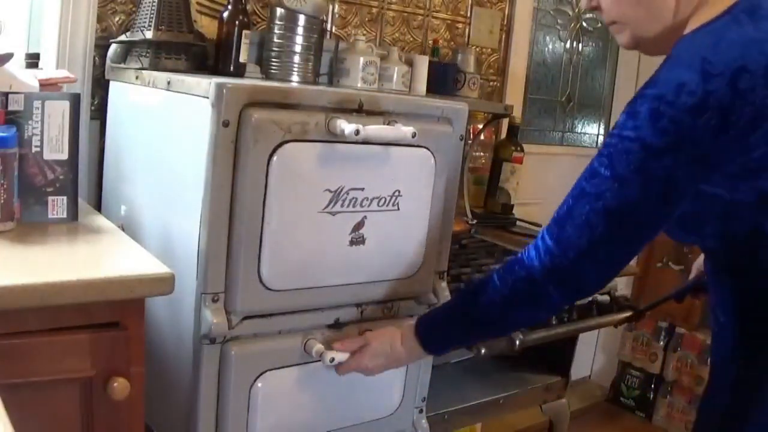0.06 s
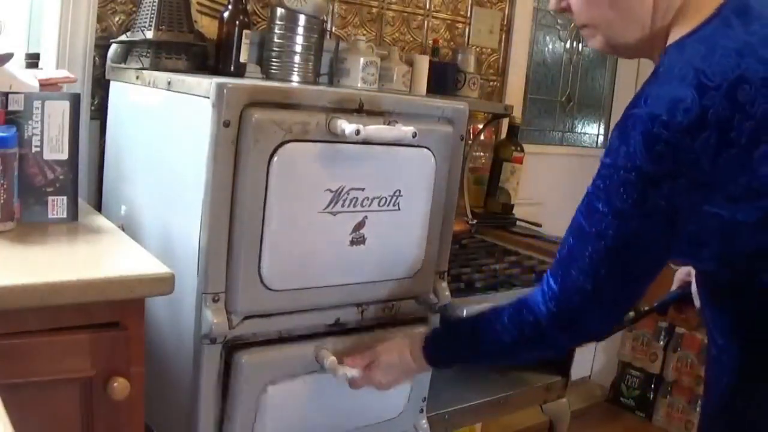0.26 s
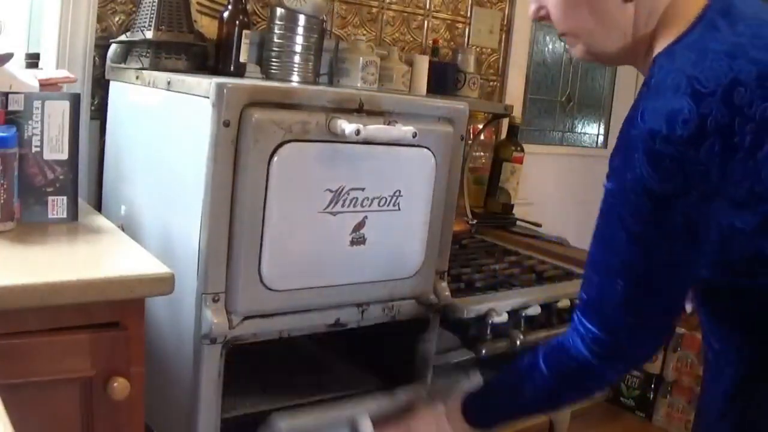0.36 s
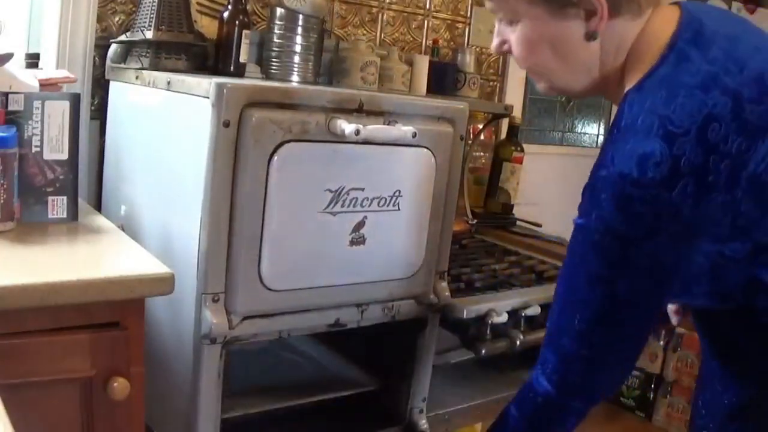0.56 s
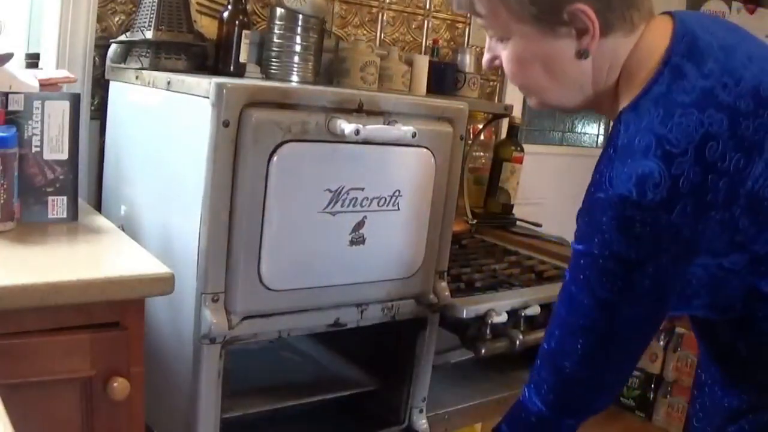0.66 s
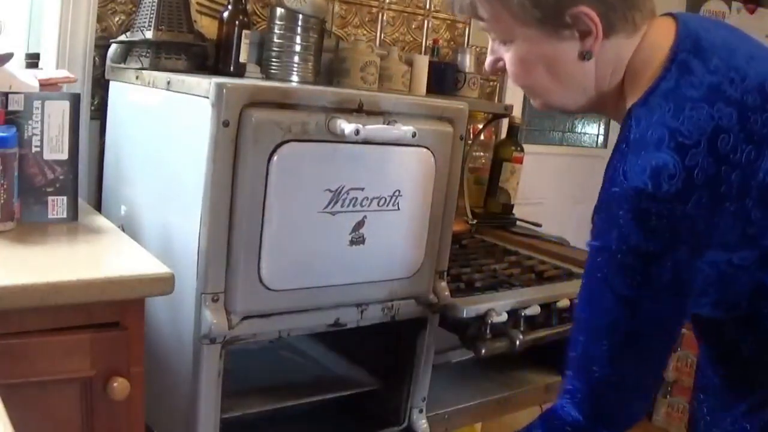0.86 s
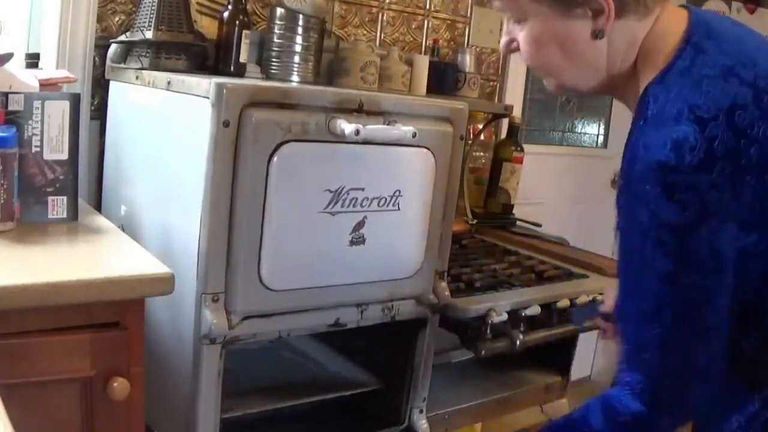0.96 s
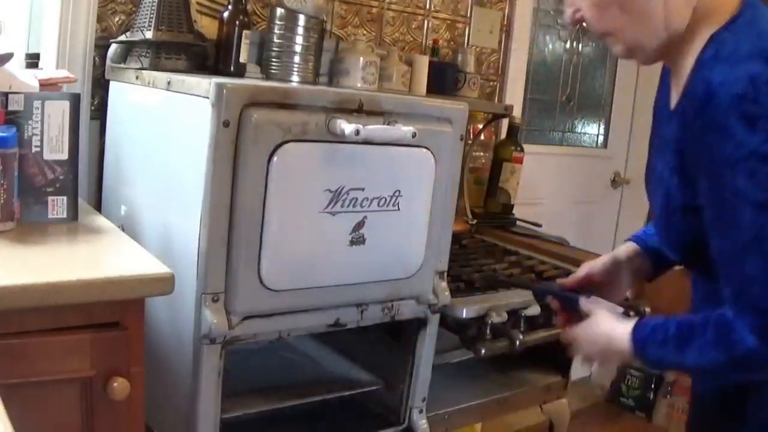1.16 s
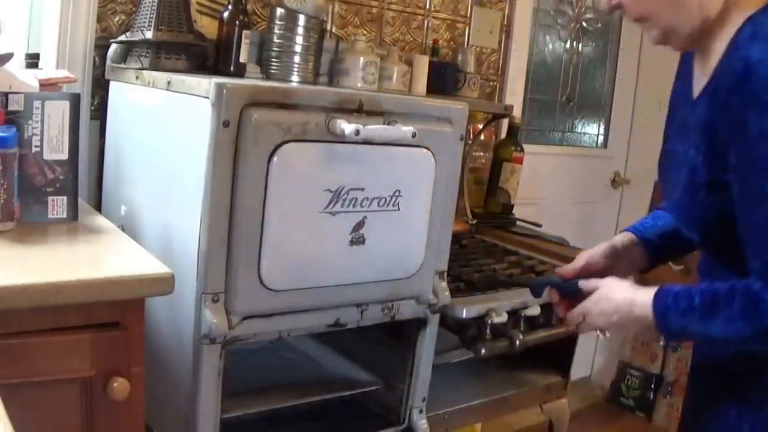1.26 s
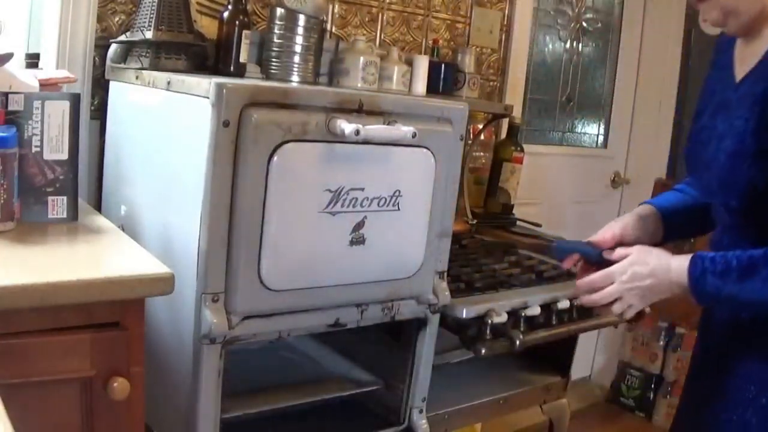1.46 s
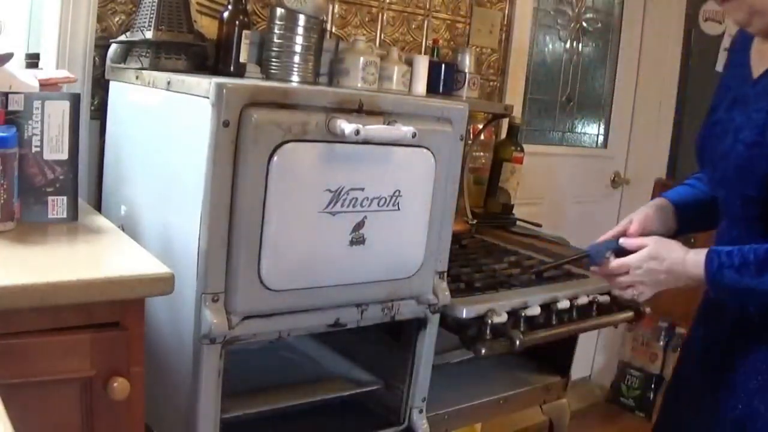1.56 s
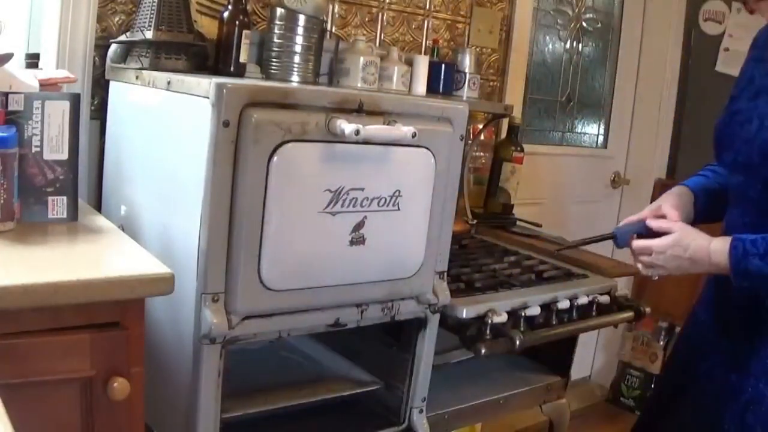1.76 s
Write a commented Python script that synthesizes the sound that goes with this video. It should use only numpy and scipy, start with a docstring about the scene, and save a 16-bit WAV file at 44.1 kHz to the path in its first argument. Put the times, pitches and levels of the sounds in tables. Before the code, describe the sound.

Close up in a small kitchen with faint hum, a light click precedes a stove door snapping free and scraping its frame; dull knocks, brief groans and squeaks follow, then a rattling rush swells and fades.

```python
"""A light metal click over quiet room noise and a faint hum in a kitchen, then the sheet-metal
oven door of an old gas stove is pulled open. The catch snaps free (decaying sines), the door
scrapes its frame (random slips through dense ringing) and rings (sine modes), then knocks, groans
and squeaks as it comes to rest (noise bursts, unsteady tones). A grainy rush of random contacts
with drifting resonances follows, swells a few times and fades, duller as it goes."""
import sys
import numpy as np
from scipy import signal
from scipy.fft import rfft, irfft, next_fast_len
from scipy.io import wavfile
from scipy.ndimage import map_coordinates

SR = 44100
rng = np.random.default_rng(int(sys.argv[2]) if len(sys.argv) > 2 else 0)


def unload_wav(signal):
    """Save mono or channel-first audio to the path in sys.argv[1] as 16-bit WAV at rate SR, clipped to [-1, 1]."""
    wavfile.write(
        sys.argv[1],
        SR,
        np.round(np.clip(np.atleast_2d(signal).T, -1, 1) * 32767).astype(np.int16),
    )


N = 79380
T = np.arange(N) / SR  # time, s

# spectrum of the room noise: hz, relative_db
FLOOR_SPECTRUM = [(25, -18), (80, -12.5), (300, -16), (1000, -27), (11000, -33.5)]
FLOOR_DB, HUM_HZ, HUM_DB = -55, 48, -62

# light clicks of handle and hinge: start_s, level_db (before HITS_TRIM_DB)
CLICKS = [(.1025, -43), (.7123, -39), (.869, -34), (.886, -30)]
# spectrum of a click: hz, relative_db
CLICK_SPECTRUM = [(100, -15), (350, 2.5), (800, -3), (1500, 0), (3000, -3), (6000, -9.5), (11000, -14.5)]
CLICK_T60_S, CRACK_T60_S, HITS_TRIM_DB = 0.63, 0.019, -2

# decay of the kitchen: hz, t60_s
KITCHEN_DECAY = [(400, 0.98), (2000, 0.35), (11000, 0.26)]
ROOM_DB, ROOM_RISE_S = -9.5, 0.031

# contacts of the catch letting go: start_s, relative_db
SNAPS = [(0.2056, -15.5), (0.2113, -16), (0.23, -22.5), (0.2526, -19)]
# modes of the catch: hz, relative_db, t60_s
CATCH_MODES = [(1211, -10, .35), (1441, -12, .35), (1666, -12, .3), (1795, 1, .15), (1829, -5.5, .25),
               (1946, -9, .25), (2055, -6, .25), (2238, -9, .35), (2402, -12, .35), (6336, -14, .3)]
# spectrum of a snap: hz, relative_db
SNAP_SPECTRUM = [(40, -34), (105, -10), (180, -22), (320, -2), (520, -20), (1050, -17.5), (1800, -1),
                 (2700, -10), (4800, -16), (6400, -11), (10900, -19)]
CATCH_MODES_DB, SNAP_BODY_DB, SNAP_T60_S = -4, -4, 0.2
MODE_WAVER = 0.25  # phase waver in rad; also fractional level waver of the door modes

# modes of the door: hz, level_db, t60_s, peak_s
DOOR_MODES = [(102, -38, 1, .43), (277, -25, .33, .29), (308, -34, .7, .39), (345, -30, .4, .23),
              (730, -20.5, .24, .338), (1740, -27, .25, .29), (2080, -25, .3, .35), (2198, -25, .3, .33),
              (2693, -25, .22, .31), (2975, -27, .25, .33), (6840, -28, .16, .29)]
DOOR_RISE_S = 0.025

# dull knocks of the door: start_s, level_db (before HITS_TRIM_DB)
KNOCKS = [(.206, -37), (.608, -35), (.62, -33), (.887, -23.5), (.894, -24), (.947, -30)]
# spectrum of a knock: hz, relative_db
KNOCK_SPECTRUM = [(50, -28), (200, -14), (340, 2), (590, -5), (1050, -16), (1470, -10), (3000, -21.5),
                  (11000, -70)]
KNOCK_T60_S = 0.34

# deep thuds of the stove's body: start_s, level_db (before THUD_GAIN)
THUDS = [(.208, -48), (.947, -37)]
THUD_HZ, THUD_T60_S, THUD_GAIN = 46, 0.2, 2

# pressure of the door on its frame: time_s, pressure_db
RUB_PRESSURE = [(.25, -44), (.254, -17), (.278, -12), (.3, -15.5), (.335, -18), (.365, -19.5), (.39, -29),
                (.45, -36), (.52, -49)]
# spectrum at the start of the stroke: hz, relative_db
RUB_BRIGHT_SPECTRUM = [(80, -23), (220, -9), (290, 0), (460, -10), (630, -2), (950, -11.5), (1700, 1),
                       (2800, -4), (4800, -9.5), (6700, -3.5), (8000, -9.5), (10900, -10)]
# spectrum as the edge comes clear: hz, relative_db
RUB_DULL_SPECTRUM = [(60, -35), (110, -3), (200, -11), (320, -0.5), (600, -8), (800, 1), (1100, -6.5),
                     (2800, 0), (5000, -12), (6800, -10.5), (10900, -35)]
DULLS_FROM_S, DULLS_UNTIL_S = 0.27, 0.36
SLIPS_PER_S, SLIP_SCATTER_DB = 6000, 3
RUB_T60_S, RUB_DB, RUB_DIRECT_DB, RUB_PANELS_DB = 0.27, -0.5, -5, -3
PANEL_RENEW_S = 0.03

# faint rub of the hinge as the door swings: time_s, level_db (before HITS_TRIM_DB)
SWING_LEVEL = [(.45, -44), (.6, -40), (.75, -44), (.82, -51)]
# spectrum of the hinge rub: hz, relative_db
SWING_SPECTRUM = [(50, -2), (110, 9), (320, 9.5), (480, 5), (11000, -17.5)]

# soft groans of the door: start_s, length_s, pitch_hz, level_db
GROANS = [(0.794, 0.086, 315, -46), (0.83, .05, 463, -45), (0.844, 0.044, 365, -35.5),
          (.908, 0.044, 411.6, -30), (0.953, .035, 325, -27.5)]

# strength of the rush: time_s, strength_db
RUSH_STRENGTH = [(.89, -32), (1.07, -29.5), (1.14, -27.5), (1.26, -28.5), (1.34, -32.5), (1.47, -33),
                 (1.61, -38.5), (1.8, -39)]
# rattling surges of the rush: start_s, added_strength_db
SURGES = [(.96, 3), (1.016, 3), (1.102, 2.5), (1.164, 2), (1.209, 3), (1.64, 4)]
# spectrum of the rush's body: hz, relative_db
BODY_SPECTRUM = [(130, -25), (230, -7.5), (350, 2.5), (520, 0), (850, 2), (1350, -2), (1900, -1),
                 (3200, -6), (5000, -15), (11000, -39)]
# spectrum of the rush's hiss, before its metal ringing: hz, relative_db
TREBLE_SPECTRUM = [(1000, -5.5), (2600, 2.5), (6100, 0.5), (6750, 0.5), (7200, -1.5), (8600, 3.5),
                   (10000, 0.5), (11000, -8.5)]
# narrow resonances of the rush: hz, width_hz, relative_db
RUSH_RINGS = [(355, 50, -15), (691.6, 60, -11), (832, 65, -13), (1024, 110, -12.5), (1676, 90, -14.5),
              (2664, 120, -15.5), (3010, 110, -14)]
RUSH_START_S, RUSH_RISE_S, SURGE_PEAK_S = 0.884, 0.0011, 0.014
BODY_DB, TREBLE_DB, GRAINS_PER_S, GRAIN_SCATTER_DB = 0.5, -3.5, 12000, 0.5
BODY_DB_PER_DB, TREBLE_DB_PER_DB = 0.61, 1.31  # response to strength
FLUTTER_DB, FLUTTER_PER_S = 1.2, 63
METAL_T60_S, METAL_DB = 0.12, 2
RING_DRIFT, RING_SWELL_DB, RING_CHANGES_PER_S = 0.025, 3, 13  # drift: fraction of pitch
# low rumble under the rush: time_s, level_db
RUMBLE_LEVEL = [(.87, -74), (.95, -39), (1.13, -40.5), (1.25, -48.5), (1.8, -61)]
# spectrum of the rumble: hz, relative_db
RUMBLE_SPECTRUM = [(36, -0.5), (65, -15), (110, 7), (220, -2.5), (1500, -46)]

# thin metal squeaks: start_s, length_s, level_db
SQUEAKS = [(.914, .014, -22), (.927, .014, -28), (.993, .018, -34)]
SQUEAK_FUNDAMENTAL_HZ, SQUEAK_JITTER, SQUEAK_SECOND_DB = 2870, 0.0117, -10.5

# bright clashes of metal on metal: start_s, level_db (before CLASH_GAIN)
CLASHES = [(1.104, -29.5), (1.112, -30), (1.21, -38)]
# spectrum of a clash: hz, relative_db
CLASH_SPECTRUM = [(200, -17), (500, -4.5), (1300, -5), (1900, 2), (2600, -2), (4200, -0.5), (5500, -9),
                  (6800, -0.5), (11000, -17.5)]
CLASH_T60_S, CLASH_GAIN = 0.22, 2

# stereo width: hz, side_over_mid_db
STEREO_WIDTH = [(50, -18), (280, -15), (600, -10)]
LEFT_DB, TOP_HZ = 0.2, 11080  # the right gets -LEFT_DB


def amp(db):
    """Decibels to gain."""
    return 10 ** (np.asarray(db) / 20)


def unit(x):
    """Scale to rms 1."""
    return x / np.sqrt(np.mean(x ** 2) + 1e-20)


def along(points, hz):
    """Interpolate (hz, value) points on a log-frequency axis."""
    point_hz, value = np.transpose(points)
    return np.interp(np.log(hz + 1), np.log(point_hz + 1), value)


def curve(points):
    """Interpolate (time_s, value) points over the scene."""
    return np.interp(T, *np.transpose(points))


def decay(t, t60_s):
    """Free exponential decay, 60 dB in t60_s, silent before time zero."""
    return np.exp(-np.log(1000) * np.maximum(t, 0) / t60_s) * (t >= 0)


def arch(start_s, length_s):
    """Half-sine envelope."""
    return np.sin(np.pi * np.clip((T - start_s) / length_s, 0, 1))


def wobble(knots_per_s):
    """Smooth random curve through Gaussian knots."""
    return map_coordinates(rng.standard_normal(4096), [T * knots_per_s], mode="mirror")


def filtered(x, response):
    """Multiply the spectrum of x by a response of frequency."""
    size = next_fast_len(N + SR // 2)
    hz = np.fft.rfftfreq(size, 1 / SR)
    return irfft(rfft(x, size) * response(hz), size)[..., :N]


def spread(pair, response):
    """Filter two unrelated signals as mid and side; return left and right at rms 1."""
    def mid_side_response(hz):
        width = amp(along(STEREO_WIDTH, hz))
        return response(hz) * np.array([np.ones_like(hz), width])
    mid, side = filtered(pair, mid_side_response)
    return unit(np.array([mid + side, mid - side]))


def noise(spectrum):
    """Steady stereo noise of a given spectrum, rms 1."""
    return spread(rng.standard_normal((2, N)), lambda hz: amp(along(spectrum, hz)))


def grains(per_s, scatter_db, spectrum):
    """Tiny contacts at random times, signs and sizes, rms 1."""
    hit = rng.random((2, N)) < per_s / SR
    sign = rng.choice([-1, 1], (2, N))
    size = amp(scatter_db * rng.standard_normal((2, N)))
    return spread(hit * sign * size, lambda hz: amp(along(spectrum, hz)))


def blows(rows, spectrum, t60_s, crack_db):
    """Each blow is shaped noise with a brief crack and a longer dense ring."""
    out = np.zeros((2, N))
    for start_s, level_db in rows:
        age = T - start_s
        envelope = decay(age, t60_s) + amp(crack_db) * decay(age, CRACK_T60_S)
        out += amp(level_db) * noise(spectrum) * envelope
    return out


def panels(x, t60_s):
    """Dense sheet-metal ringing whose resonances change as the contact moves on."""
    out = np.zeros_like(x)
    t = T[T < t60_s]
    for centre_s in np.arange(0, N / SR, PANEL_RENEW_S):
        near = np.flatnonzero(abs(T - centre_s) < PANEL_RENEW_S)
        window = np.cos(np.pi / 2 * (T[near] - centre_s) / PANEL_RENEW_S)
        ring = rng.standard_normal(len(t)) * decay(t, t60_s)
        ring /= np.linalg.norm(ring)
        start = near[0]
        answer = signal.fftconvolve(x[:, near] * window, ring[None])[:, :N - start]
        out[:, start:start + answer.shape[1]] += answer
    return out


def room_floor():
    """Steady shaped noise plus a sine hum."""
    hum = np.sin(2 * np.pi * HUM_HZ * T)
    return amp(FLOOR_DB) * noise(FLOOR_SPECTRUM) + amp(HUM_DB) * hum


def clicks():
    """Light metal contacts: a strong crack over a thin, dense ring."""
    return blows(CLICKS, CLICK_SPECTRUM, CLICK_T60_S, crack_db=-3)


def kitchen(x):
    """Convolve with a decaying noise tail whose treble dies first."""
    white = noise([(20, 0), (20000, 0)])
    hz, t, z = signal.stft(white, SR, nperseg=256)
    z = z * decay(t, along(KITCHEN_DECAY, hz)[:, None])
    tail = signal.istft(z, SR, nperseg=256)[1][:, :N]
    tail = tail * np.clip(T / ROOM_RISE_S, 0, 1)
    return signal.fftconvolve(x, tail / np.linalg.norm(tail[0]), axes=1)[:, :N]


def catch():
    """The catch snaps free and chatters; each contact renews its decaying modes."""
    ring = np.zeros(N)
    age = T - SNAPS[0][0]
    for hz, relative_db, t60_s in CATCH_MODES:
        energy = sum((amp(snap_db) * decay(T - s, t60_s)) ** 2 for s, snap_db in SNAPS)
        phase = 2 * np.pi * hz * age + MODE_WAVER * wobble(130.8)
        ring += amp(relative_db) * np.sqrt(energy) * np.sin(phase)
    body = blows(SNAPS, SNAP_SPECTRUM, SNAP_T60_S, crack_db=-7)
    return amp(CATCH_MODES_DB) * ring + amp(SNAP_BODY_DB) * body


def door():
    """Each wavering mode builds exponentially to its peak, then rings out."""
    out = np.zeros(N)
    for hz, level_db, t60_s, peak_s in DOOR_MODES:
        age = T - peak_s
        build_up = np.exp(np.minimum(age, 0) / DOOR_RISE_S)
        swell = np.where(age < 0, build_up, decay(age, t60_s)) * (T > SNAPS[0][0])
        swell = swell * (1 + MODE_WAVER * wobble(68.2))
        phase = 2 * np.pi * hz * T + rng.uniform(0, 2 * np.pi) + MODE_WAVER * wobble(68.8)
        out += amp(level_db) * swell * np.sin(phase)
    return out


def knocks():
    """Dull blows of the door: dense low ringing with hardly any crack."""
    return blows(KNOCKS, KNOCK_SPECTRUM, KNOCK_T60_S, crack_db=-32)


def thuds():
    """Deep, short pushes of the stove's body as decaying sines."""
    out = np.zeros(N)
    for start_s, level_db in THUDS:
        age = T - start_s
        out += amp(level_db) * decay(age, THUD_T60_S) * np.sin(2 * np.pi * THUD_HZ * age)
    return THUD_GAIN * out


def scrape():
    """Quick slips of the door's edge shake the panels, duller as the edge comes clear."""
    turn = np.pi / 2 * np.interp(T, [DULLS_FROM_S, DULLS_UNTIL_S], [0, 1])
    bright = grains(SLIPS_PER_S, SLIP_SCATTER_DB, RUB_BRIGHT_SPECTRUM)
    dull = grains(SLIPS_PER_S, SLIP_SCATTER_DB, RUB_DULL_SPECTRUM)
    touching = (T > RUB_PRESSURE[0][0]) * (T < RUB_PRESSURE[-1][0])
    slips = (np.cos(turn) * bright + np.sin(turn) * dull) * amp(curve(RUB_PRESSURE)) * touching
    ringing = panels(slips, RUB_T60_S)
    return amp(RUB_DB) * (amp(RUB_DIRECT_DB) * slips + amp(RUB_PANELS_DB) * ringing)


def swing():
    """The hinge rubs faintly as the door swings open: low shaped noise."""
    moving = (T > SWING_LEVEL[0][0]) * (T < RUSH_START_S)
    return amp(curve(SWING_LEVEL)) * moving * noise(SWING_SPECTRUM)


def groans():
    """Short, low sines with unsteady phase swell and die."""
    out = np.zeros(N)
    for start_s, length_s, pitch_hz, level_db in GROANS:
        tone = np.sin(2 * np.pi * pitch_hz * T + wobble(60))
        out += amp(level_db) * arch(start_s, length_s) * tone
    return out


def metal(x):
    """Close, quickly dying resonances of sheet metal colour a sound, rms 1."""
    return unit(x + amp(METAL_DB) * panels(x, METAL_T60_S))


def streak(hz, width_hz):
    """A narrow noise resonance that drifts in pitch and comes and goes, rms 1."""
    drifting_hz = hz * (1 + RING_DRIFT * wobble(RING_CHANGES_PER_S))
    phase = 2 * np.pi * np.cumsum(drifting_hz) / SR
    pair = np.array([wobble(width_hz) * np.cos(phase) + wobble(width_hz) * np.sin(phase)
                     for _ in range(2)])
    swell = amp(RING_SWELL_DB * wobble(RING_CHANGES_PER_S))
    return spread(pair * swell, np.ones_like)


def rush():
    """One uneven strength drives grains, narrow resonances and hiss, over a low rumble."""
    strength_db = curve(RUSH_STRENGTH)
    mean_db = np.mean(strength_db[T > RUSH_START_S])
    swell_db = strength_db - mean_db + FLUTTER_DB * wobble(FLUTTER_PER_S)
    for start_s, added_db in SURGES:
        age = np.maximum(T - start_s, 0) / SURGE_PEAK_S
        swell_db += added_db * age * np.exp(1 - age)
    rings = sum(amp(db) * streak(hz, width_hz) for hz, width_hz, db in RUSH_RINGS)
    body = amp(BODY_DB) * grains(GRAINS_PER_S, GRAIN_SCATTER_DB, BODY_SPECTRUM) + rings
    body = amp(BODY_DB_PER_DB * swell_db) * body
    # treble follows strength more steeply, so the fade dulls
    hiss = metal(grains(GRAINS_PER_S, GRAIN_SCATTER_DB, TREBLE_SPECTRUM))
    hiss = amp(TREBLE_DB + TREBLE_DB_PER_DB * swell_db) * hiss
    onset = np.clip((T - RUSH_START_S) / RUSH_RISE_S, 0, 1)
    rumble = amp(curve(RUMBLE_LEVEL)) * noise(RUMBLE_SPECTRUM)
    return onset * amp(mean_db) * (body + hiss) + rumble


def squeaks():
    """Short squeaks of jittering pitch, on second and third harmonics only."""
    pitch_hz = SQUEAK_FUNDAMENTAL_HZ * (1 + SQUEAK_JITTER * wobble(900))
    phase = 2 * np.pi * np.cumsum(pitch_hz) / SR
    gate = sum(amp(db) * arch(start_s, length_s) for start_s, length_s, db in SQUEAKS)
    return gate * (np.sin(3 * phase) + amp(SQUEAK_SECOND_DB) * np.sin(2 * phase))


def clashes():
    """Metal strikes metal: bright dense ringing with a slight crack."""
    return CLASH_GAIN * blows(CLASHES, CLASH_SPECTRUM, CLASH_T60_S, crack_db=-16)


def scene():
    """The stove in its kitchen; door modes, thuds, rush and floor take no room tail."""
    trimmed = amp(HITS_TRIM_DB) * (clicks() + knocks() + swing())
    stove = trimmed + catch() + scrape() + groans() + squeaks() + clashes()
    tail = amp(ROOM_DB) * kitchen(stove)
    mix = room_floor() + stove + tail + door() + thuds() + rush()
    return mix * amp([[LEFT_DB], [-LEFT_DB]])


def record(dry):
    """Nothing is kept above the band limit."""
    return filtered(dry, lambda hz: hz < TOP_HZ)


dry = scene()
out = record(dry)
unload_wav(out)
```